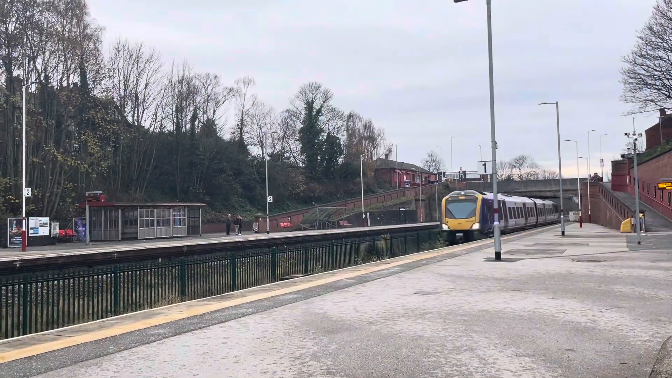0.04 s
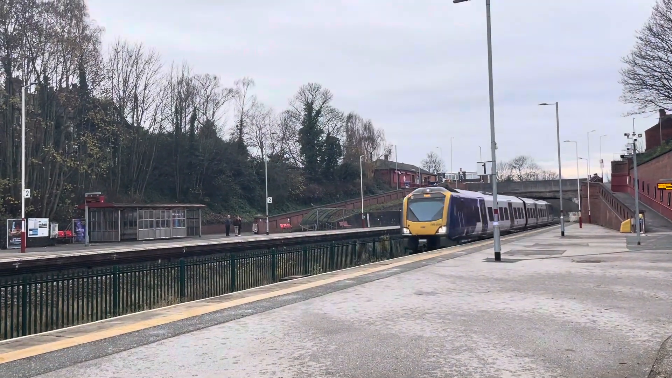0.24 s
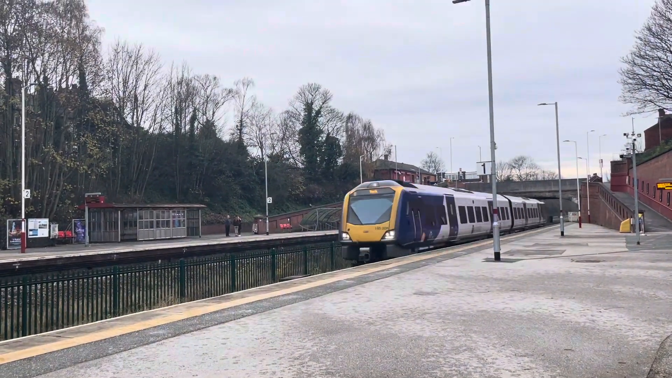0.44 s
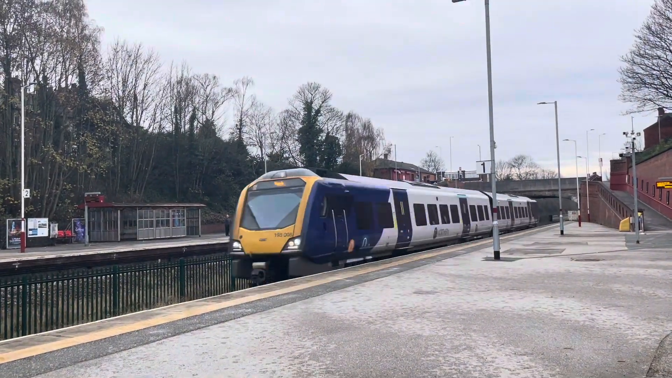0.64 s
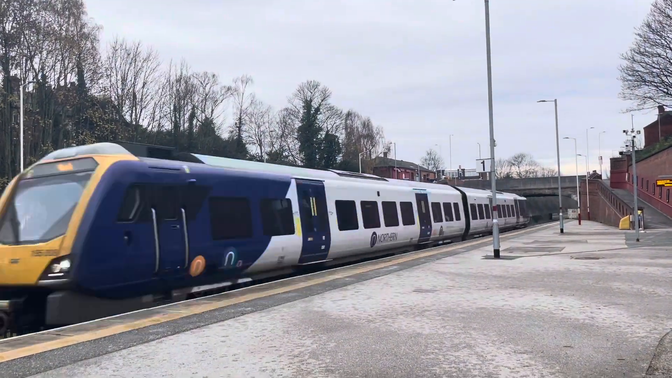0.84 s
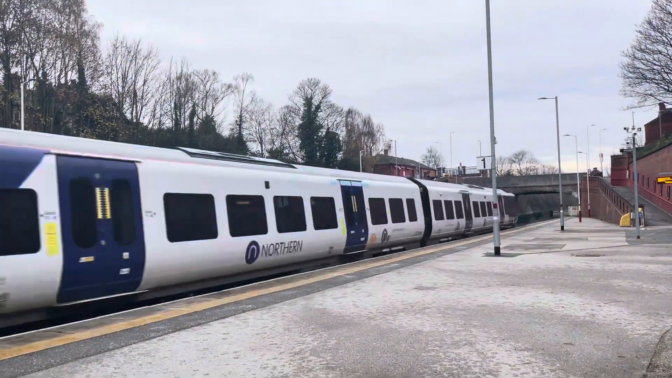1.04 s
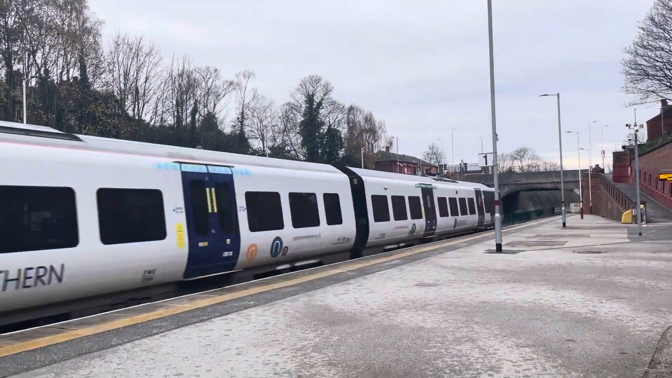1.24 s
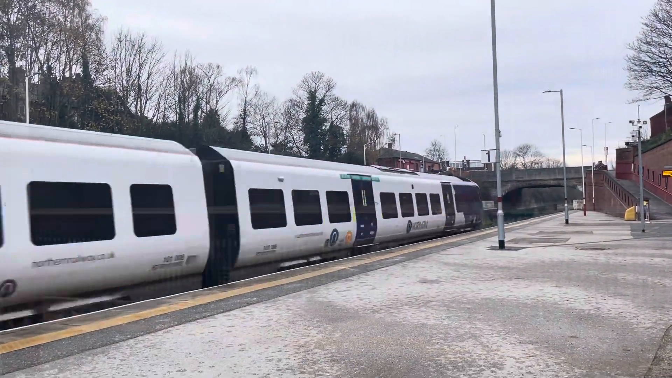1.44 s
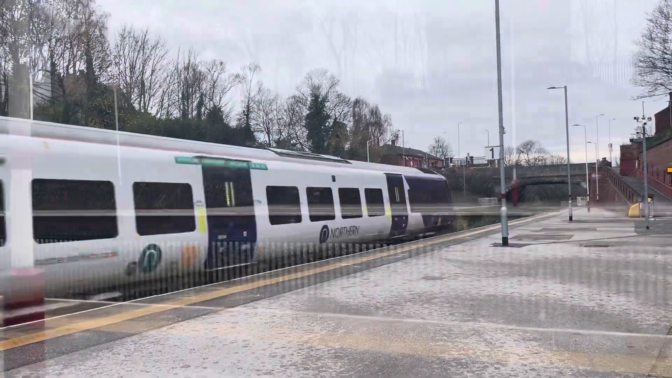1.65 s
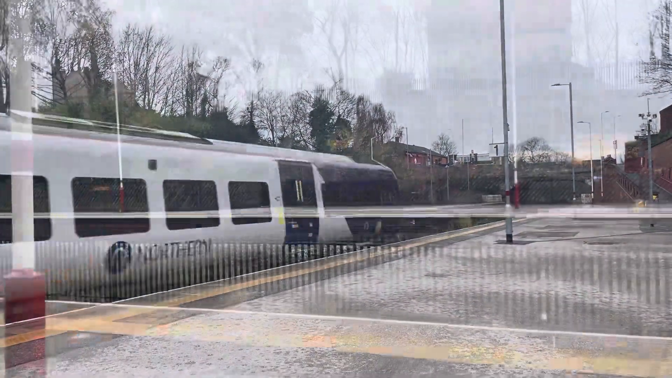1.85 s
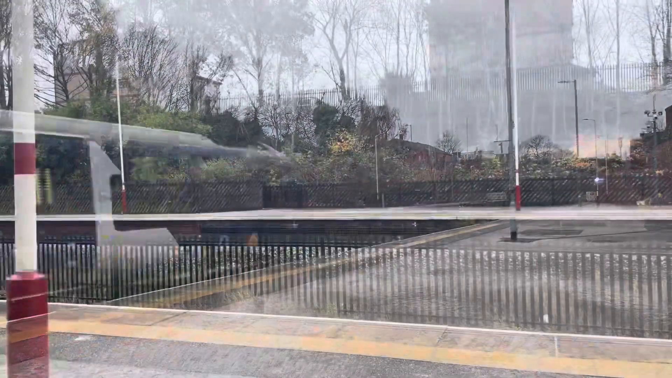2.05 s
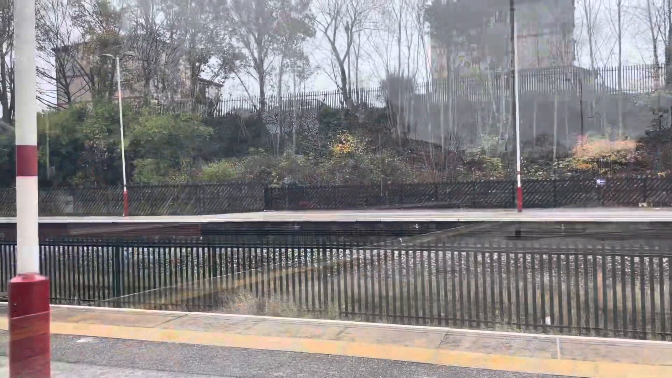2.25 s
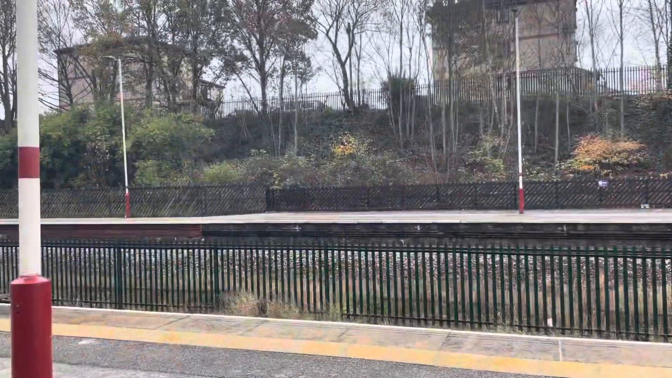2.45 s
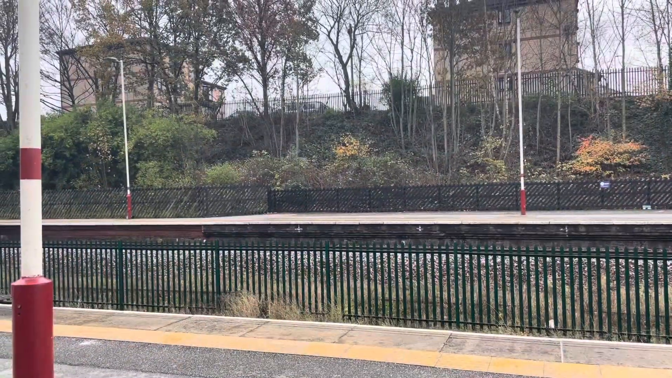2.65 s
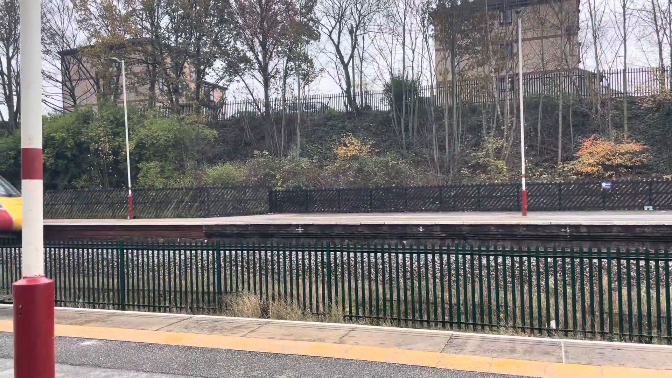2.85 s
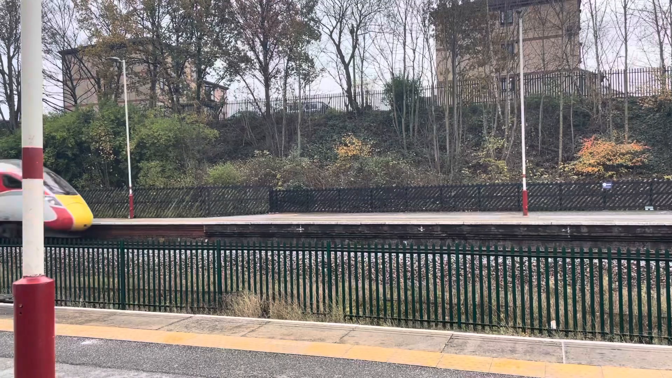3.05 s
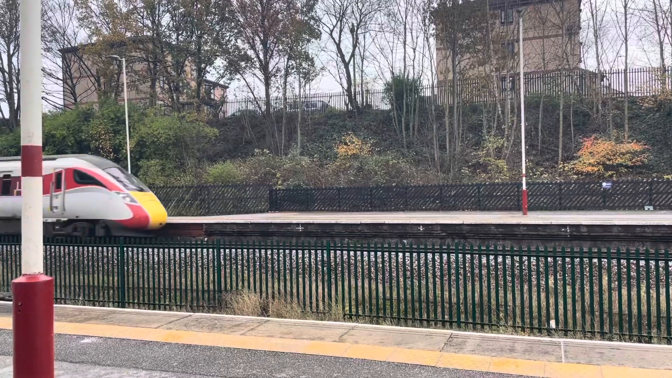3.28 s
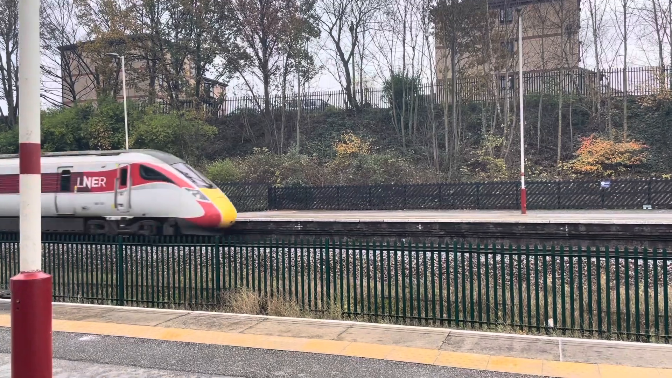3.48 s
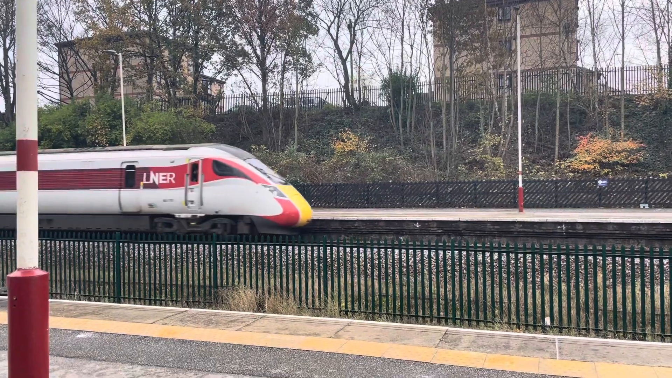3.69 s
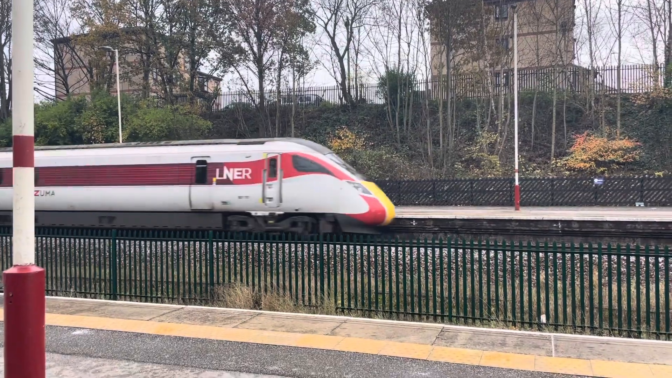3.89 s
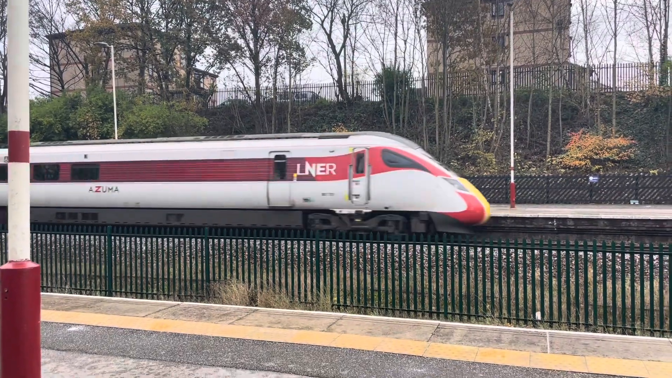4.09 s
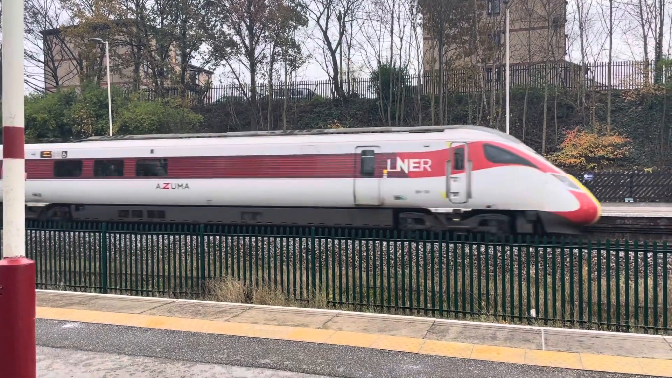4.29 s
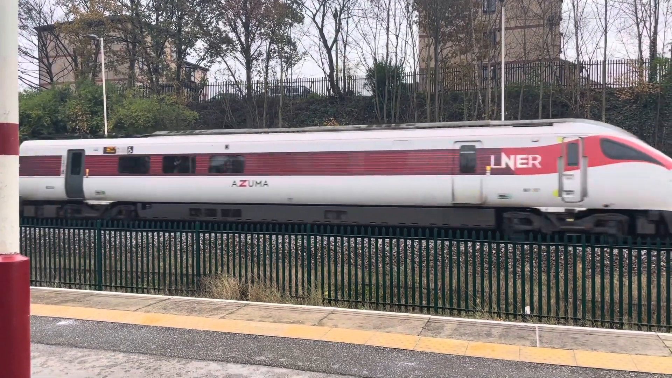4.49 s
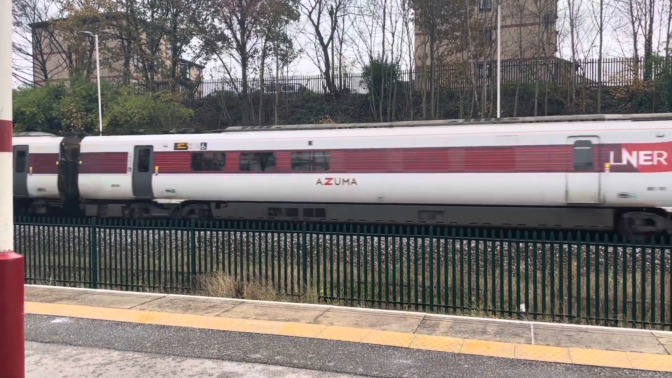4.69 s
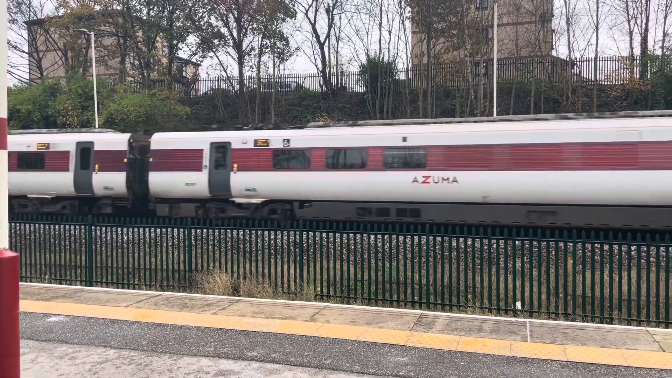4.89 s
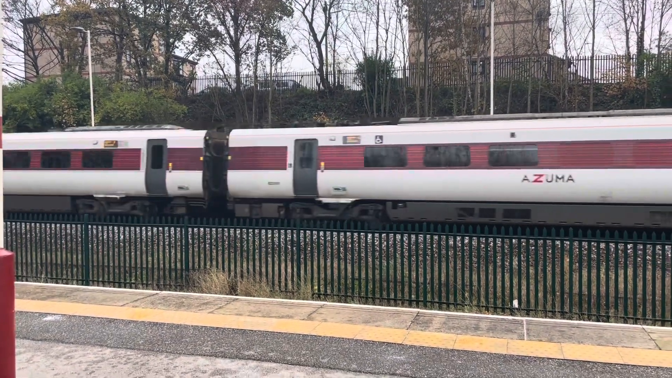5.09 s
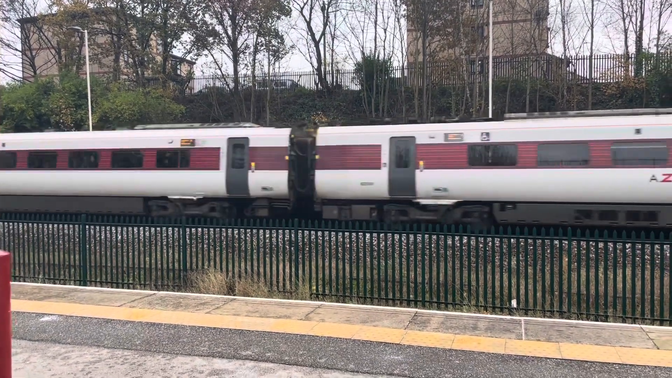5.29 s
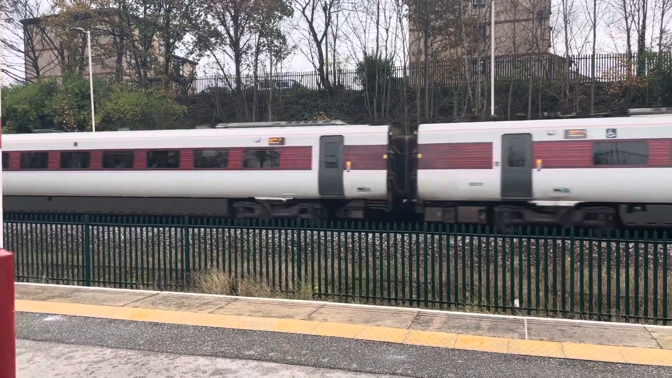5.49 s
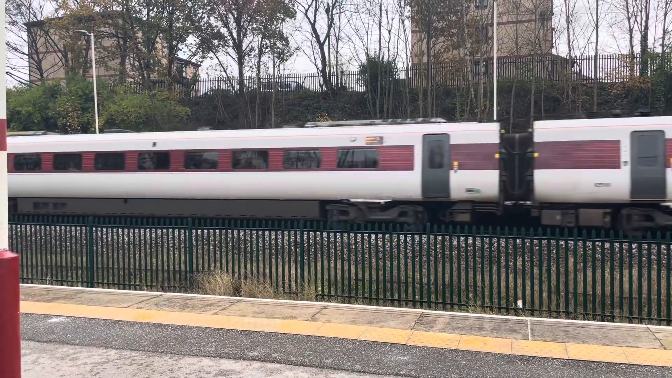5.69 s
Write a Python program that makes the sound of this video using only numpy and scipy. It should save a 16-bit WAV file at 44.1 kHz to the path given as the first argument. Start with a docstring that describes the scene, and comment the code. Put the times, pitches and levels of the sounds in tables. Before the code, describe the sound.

Outdoors on a station platform, heard in stereo. From 0 s a short train approaches very close, its broad wheel roar and low engine drone rising quickly. Around 0.7-1.1 s thumps and a brief squeal mark the first wheels; between 1 and 1.8 s it is loudest, with rough metallic ringing, rasping high notes dropping in pitch, a mid-low growl, short squeals and bumps. The deep drone dips around 1.6 s as the engine draws level, then returns lower. Thin, airy whistles slide down near 1.4 and 2 s. From about 1.3 to 2.4 s this train fades away beneath a far quieter one. From 2.4 s a long train on a distant track gives an even, gently fluttering rumble that builds after 3 s, with faint high wheel rings. From 3.8 s a low wavering hum surges repeatedly, with soft bumps near 4.2, 5 and 5.6 s, continuing until the cut at 5.7 s.

```python
"""A station platform, with two passenger trains going by. A short one rushes past close to the edge:
filtered noise for its wheel roar, a Doppler-shifted engine drone, turbo whistles and ringing wheels.
It fades into a long train on a far track: an even noise rumble, a low hum of locked tones and faint
wheel rings. Brief squeals and thumps of narrow noise are dotted over both."""
import sys
import numpy as np
from scipy import signal
from scipy.fft import rfft, irfft, next_fast_len
from scipy.io import wavfile
from scipy.ndimage import map_coordinates

SR = 44100
rng = np.random.default_rng(int(sys.argv[2]) if len(sys.argv) > 2 else 0)


def pcm_store(signal):
    """Save signal as 16-bit PCM."""
    levels = np.round(np.clip(np.atleast_2d(signal), -1, 1) * 32767)
    wavfile.write(sys.argv[1], SR, levels.astype(np.int16).T)


N = 252693
T = np.arange(N) / SR  # s
HZ = np.maximum(np.fft.rfftfreq(N, 1 / SR), 1)
SOUND_M_S, TOP_HZ = 343, 13500

# Stereo: mixing likeness and balance by pitch (likeness is held to -0.9..0.995)
# pitch_hz, likeness, left_minus_right_db
STEREO_IMAGE = [(60, 1, -2), (250, 0.92, -1.5), (480, 0.51, 2), (890, 0.76, 1.6), (1310, 0.14, -0.5),
                (1880, 0.29, -1), (2340, 0.78, 1), (3260, 0.22, 4), (4770, 0.68, 0), (6260, 0.084, 2),
                (7830, -2.35, 3.5), (10040, 1, -1), (14000, -1, 1)]
# Direction of the trains: start_s, right_channel_lag_ms
BEARING = [(0, 0.047), (.7, 0.021), (1.1, 0.34), (1.5, 0.31), (2.1, 0.37), (2.6, 0.21), (3.4, 0.12),
           (4.2, 0.09), (5.73, 0.011)]

# Far train: moment its nose draws level, speed, distance of its track, length
FAR_NOSE_S, FAR_M_S, FAR_TRACK_M, FAR_LENGTH_M = 3.4, 18.7, 33.4, 350
# Near train, likewise
NEAR_NOSE_S, NEAR_M_S, NEAR_TRACK_M, NEAR_LENGTH_M = 0.9, 35, 7.5, 56
# The near train has faded out, the far one is fully in; each fade lasts FADE_S
NEAR_GONE_S, FAR_FULL_S, FADE_S = 2.404, 2.1, 1.12

# Spectral shape of the rolling noise: pitch_hz, relative_level_db (per Hz)
FAR_COLOUR = [(20, -31), (45, 2.5), (130, -0.5), (270, -3), (370, -7), (580, -3.5), (740, -2), (1120, -7),
              (1300, -13.5), (2050, -14), (2520, -15.5), (2800, -21), (5400, -23.5), (8000, -32),
              (11500, -40.5), (13000, -45)]
NEAR_COLOUR = [(20, -26), (48, 4.5), (110, -3), (230, -4), (360, -10), (520, -8), (1000, -6), (1350, -17),
               (2500, -25.5), (3500, -27.5), (5900, -29.5), (8000, -34.5), (10500, -36), (12000, -43),
               (13000, -49.5)]
# Rail and wheel resonances: pitch_hz, width_hz, height_db (above the rolling noise)
FAR_MODES = [(243, 75, 2.8), (708, 51, 5.3), (924, 35, 7), (1108, 45, 6.2), (1560, 63, 1.9),
             (3140, 250, 5.3), (4770, 88, 2.9)]
NEAR_MODES = [(474, 110, 7), (930, 310, 2), (2455, 270, 5.5), (5680, 400, 3.2)]
# Rows are body rumble, rail roar, wheel ring, air hiss: level_db (at 0 dB swell),
# steepness (of the swell; 1 = spreading alone), flutter_db
FAR_PARTS = [(-28.5, 2.69, 0.66), (-27.5, 2.19, 0.71), (-33, 2.99, 0.53), (-37, 3.62, 0.48)]
NEAR_PARTS = [(-18, 0.47, 1), (-20, 1.024, 0.82), (-27, 0.94, 1.16), (-30.5, 1.17, 0.95)]
# Where rumble gives way to roar, roar to ring and ring to hiss
FAR_CROSSOVERS_HZ, NEAR_CROSSOVERS_HZ = [486, 1274, 3000], [358, 1430, 2680]
# Rolling noise surges as a pair of bogies comes by: centre_s, length_s, rise_db
FAR_SURGES = [(3.1, 0.14, 0.29), (4.14, 0.22, 0.53), (4.98, 0.067, 0.12), (5.48, 0.066, 0.27)]
NEAR_SURGES = [(1.09, 0.078, 0), (1.63, 0.34, 2.5)]

# Ringing of the far wheels: pitch_hz, scatter_hz, level_db (relative to the wheel ring part)
FAR_RINGS = [(2060, 140, -11), (3900, 150, -17.5)]
# Doppler glide of the far rings: start_s, pitch_factor
FAR_DOPPLER = [(2.2, 1), (3.3, 1.02), (4.4, .995), (5.73, 0.91)]
# Hum of the far drive swells as driven bogies come by: start_s, line_level_db, octave_level_db
HUM_LEVELS = [(2.3, -47.5, -50.5), (2.75, -46, -46.5), (3.55, -46.5, -48.5), (3.8, -40.5, -33.5),
              (3.97, -40.5, -39), (4.14, -32, -34), (4.33, -37.5, -46), (4.6, -38, -46), (4.8, -37.5, -40),
              (5.02, -31.5, -38.5), (5.15, -36.5, -44), (5.38, -31, -35), (5.5, -37.5, -40.5),
              (5.6, -29, -47), (5.73, -39, -40)]
# Centre pitch of the hum line, and level of the engine drone two octaves under it
HUM_HZ, DRONE_DB = 232.6, -43.5

# Bogies rumble over a rough spot: centre_s, pitch_hz, length_s, level_db
BUMPS = [(.75, 343, 0.05, -27.5), (1.0, 490, 0.035, -26), (1.0, 234, 0.21, -27), (1.155, 160, 0.024, -20.5),
         (1.491, 343, 0.048, -35), (1.475, 591, 0.03, -23), (1.525, 555, 0.034, -28),
         (1.598, 465, 0.031, -23), (1.786, 239.3, 0.19, -30.5), (4.2, 140.8, 0.12, -38.5),
         (4.96, 390, 0.045, -32), (5.57, 255, 0.06, -33), (5.688, 791, 0.032, -30)]
# Short wheel squeals: centre_s, pitch_hz, glide_hz_per_s, length_s, level_db, roughness (0-1)
SQUEALS = [(0.64, 954, 60.5, 0.14, -29.5, 0.6), (1.066, 920, 296, 0.05, -33, 0.6),
           (1.351, 946, 199.5, 0.051, -27, 0.6), (1.326, 1200, 2, 0.062, -35, 0.8),
           (1.447, 1580, -1.5, 0.071, -31, 0.8), (1.623, 2130, -900, 0.05, -29, 0.5),
           (2.236, 2054, -300, 0.06, -47.5, 0.8), (2.986, 2046, -200, 0.059, -46, 0.5),
           (3.18, 2070, 0, 0.06, -45, 0.9), (4.045, 2070, -500, 0.064, -45, 0.9),
           (4.577, 3195, 500, 0.03, -41.5, 0.5), (5.13, 3880, 0, 0.07, -46, 0.8)]

# Growl of the near drive: start_s, pitch_hz, level_db
GROWL = [(0.8, 470, -60), (1.11, 457, -27.5), (1.22, 460, -28), (1.34, 463, -20.5), (1.42, 460, -34),
         (1.48, 445, -19.5), (1.59, 436, -24), (1.68, 430, -35), (1.86, 448, -36), (1.95, 453, -26),
         (2.06, 438, -36), (2.4, 430, -73)]
# Near engine: moment it draws level, firing rate at rest
ENGINE_PASSES_S, FIRING_HZ = 1.64, 75.3
# Drone level alongside before the dip, second harmonic relative to it before it thins out nearby
ENGINE_DB, SECOND_DB = -12, -19
# Other engine overtones: multiple (of the firing rate), level_db (relative to the firing line)
ENGINE_ORDERS = [(2.5, -17.5), (3, -15.5), (4, -20)]
# The drone dips while the engine is straight across: depth, and reach along the track
ABREAST_DIP_DB, ABREAST_M = -13, 4.9

# Near wheelsets, each with its own modes: passes_s, level_db
WHEELSETS = [(1.12, -28.5), (1.33, -34.5), (1.6, -27)]
# Spectral shape of their ringing: pitch_hz, relative_level_db (per Hz)
WHEEL_COLOUR = [(700, -37), (1300, -6), (2450, 2.5), (3000, -4), (3600, -10.5), (6100, -7.5), (7500, -33),
                (13000, -45)]
# Singing bogies of the near train: passes_s, pitch_hz, glide_hz_per_s, length_s, level_db
BOGIES = [(1.18, 2358, -300, 0.17, -26), (1.541, 2320, -1800, 0.13, -29)]
# A higher wheel mode sings along: pitch, level relative to the main ring
UPPER_RING_HZ, UPPER_RING_DB = 5700, -12
# Turbochargers, one for each car: passes_s, pitch_hz (at rest), level_db (alongside)
TURBOS = [(1.36, 10140, -45), (1.975, 9980, -41)]
# Closest distance, width of the whistle, how sharply it swells close by (power of the distance gain)
TURBO_M, TURBO_WIDTH_HZ, TURBO_BEAM = 9.5, 220, 2.3
# Rushing air around the whistle: level relative to it, width
RUSH_DB, RUSH_WIDTH_HZ = 1, 1400


def undb(db):
    """Decibels to gain."""
    return 10 ** (np.asarray(db) / 20)


def curves(table):
    """Each column after the first (s), drawn as a line through time."""
    s, *columns = np.transpose(table)
    return [np.interp(T, s, column) for column in columns]


def spectra(table):
    """Each column after the first (Hz), drawn as a line over log frequency."""
    hz, *columns = np.transpose(table)
    return [np.interp(np.log(HZ), np.log(hz), column) for column in columns]


def unit(x):
    """Scaled to rms 1."""
    return x / np.sqrt(np.mean(np.abs(x) ** 2))


def walk(rate):
    """Smooth random drift of rms about 1 that changes about rate times a second."""
    step = max(int(SR / rate / 20), 1)
    size = next_fast_len(N // step + 2, real=True)
    hz = np.fft.rfftfreq(size, step / SR)
    smoothing = np.exp(-.5 * (hz / rate) ** 2)
    coarse = irfft(rfft(rng.standard_normal(size)) * smoothing, size)
    return unit(np.interp(np.arange(N) / step, np.arange(size), coarse))


def cycle(hz):
    """Phase of something that turns hz times a second."""
    return 2 * np.pi * np.cumsum(hz) / SR


def tone(phase, rough, width_hz):
    """A sine line; the share rough of its power is smeared over width_hz by scattered paths."""
    rough = np.clip(rough, 0, 1)
    scatter = (walk(width_hz) + 1j * walk(width_hz)) / np.sqrt(2)
    envelope = np.sqrt(1 - rough) + np.sqrt(rough) * scatter
    return np.sqrt(2) * np.real(envelope * np.exp(1j * phase))


def bell(s, length):
    """A smooth swell of height 1 around time s."""
    return np.exp(-.5 * ((T - s) / (0.64 * length)) ** 2)


def note(s, hz, glide, length, db, rough, spread):
    """A gliding note that swells briefly and dies away; spread is its width as a share of hz."""
    pitch = hz + glide * np.clip(T - s, -2 * length, 2 * length)
    return tone(cycle(pitch), rough, spread * hz) * undb(db) * bell(s, length)


def fade(progress):
    """An even rise from 0 to 1."""
    return np.clip(progress, 0, 1)


def resonances(modes):
    """Gain at every frequency of a set of (pitch_hz, width_hz, height_db) peaks."""
    return undb(sum(db / (1 + (2 * (HZ - hz) / width_hz) ** 2) for hz, width_hz, db in modes))


def wheel_modes(count, width_hz, height_db):
    """Differently worn steel wheels add thin, unevenly spaced resonances, up to height_db tall."""
    draws = rng.random((count, 2))
    return [(1200 + 5500 * (k + place) / count, width_hz, height_db * size)
            for k, (place, size) in enumerate(draws)]


def bend(x, pitch):
    """A sound with its pitch multiplied by a changing factor."""
    return map_coordinates(x, [np.cumsum(pitch * np.ones(N))], order=3, mode="mirror")


def pair(direct, diffuse):
    """A direct and a diffuse sound mixed to left and right by pitch; their pure tones may coincide."""
    likeness, balance_db = spectra(STEREO_IMAGE)
    likeness = np.clip(likeness, -.9, .995)
    sides = np.array([[1], [-1]])
    shared = rfft(direct) * np.sqrt((1 + likeness) / 2)
    opposed = sides * rfft(diffuse) * np.sqrt((1 - likeness) / 2)
    return irfft((shared + opposed) * undb(sides * balance_db / 2), N)


def aim(x):
    """Sound from the left reaches the right channel later."""
    lag_ms, = curves(BEARING)
    return np.array([x[0], np.interp(T - lag_ms / 1000, T, x[1])])


def train_db(nose_s, speed, track_m, length_m):
    """A train is a line of sources: power follows the angle it fills (0 dB = the whole track)."""
    nose_m = speed * (T - nose_s)
    tail_m = nose_m - length_m
    angle = np.arctan(nose_m / track_m) - np.arctan(tail_m / track_m)
    return 10 * np.log10(angle / np.pi)


def surges_db(table):
    """Extra loudness of the bogies that are passing."""
    return sum(db * bell(s, length) for s, length, db in table)


def fly_by(passes_s, track_m):
    """A point of the near train: metres past the listener, distance gain, Doppler factor."""
    along = NEAR_M_S * (T - passes_s)
    distance = np.hypot(along, track_m)  # track_m is the closest approach
    doppler = 1 / (1 + NEAR_M_S / SOUND_M_S * along / distance)
    return along, track_m / distance, doppler


def rolling(swell_db, levels, crossovers_hz, colour, modes, drift, flutter_rate):
    """Roughness of wheel and rail shakes body, rails and wheels; each part swells with the train."""
    noise = pair(*rng.standard_normal((2, N)))
    steady = irfft(rfft(noise) * undb(spectra(colour)[0]) * resonances(modes), N)
    # the resonances wander as one wheel after another takes over
    pitch = 1 + drift * walk(3)
    rest = rfft(np.array([bend(side, pitch) for side in steady]))
    parts = []
    for hz in crossovers_hz:
        below = 1 / (1 + (HZ / hz) ** 10)
        parts.append(irfft(rest * below, N))
        rest = rest * (1 - below)
    parts.append(irfft(rest, N))
    # uneven track loads all parts together, and each flutters alone
    load = walk(flutter_rate)
    moving = []
    for part, (db, steepness, flutter_db) in zip(parts, levels):
        flutter = flutter_db * (.5 * load + walk(flutter_rate))
        moving.append(unit(part) * undb(db + steepness * swell_db + flutter))
    rumble, roar, ring, hiss = moving
    return aim(rumble + roar) + ring + hiss


def hum(swell_db):
    """Far engines and drive: a drone and its octave, and two thin wavering lines locked to it."""
    phase = cycle(HUM_HZ * (1 + 0.00402 * walk(6)))
    line_db, octave_db = curves(HUM_LEVELS)
    line = tone(phase, rough=0.25, width_hz=12) * undb(line_db)
    octave = tone(2 * phase, rough=0.13, width_hz=16) * undb(octave_db)
    drone = tone(phase / 4, rough=0.48, width_hz=11.0)
    drone_octave = undb(6.5 + 3.2 * swell_db) * tone(phase / 2, rough=0.4, width_hz=17)
    return line + octave + (drone + drone_octave) * undb(DRONE_DB)


def far_wheels(swell_db):
    """Far wheel modes come and go, waver, and glide with the Doppler curve, sinking at the end."""
    doppler, = curves(FAR_DOPPLER)
    ring_db, steepness, _ = FAR_PARTS[2]
    rings = 0
    for hz, scatter_hz, db in FAR_RINGS:
        phase = cycle(hz * doppler * (1 + 0.00601 * walk(4)))
        level_db = ring_db + steepness * swell_db + db + 3.8 * walk(7)
        rings = rings + tone(phase, 0.98, scatter_hz) * undb(level_db)
    return rings


def bumps():
    """A bogie shakes the track for a moment: a short, rough, low-to-middle note."""
    return sum(note(s, hz, 0, length, db, rough=0.94, spread=0.15) for s, hz, length, db in BUMPS)


def squeals():
    """A wheel mode sings out briefly."""
    return sum(note(*row, spread=0.023) for row in SQUEALS)


def growl():
    """The near drive growls on one unbroken note that sags and swells as each car goes by."""
    hz, db = curves(GROWL)
    return tone(cycle(hz), rough=0.35, width_hz=34) * undb(db)


def bogies():
    """The wheels of a bogie ring in a rasping band that drops in pitch, with a thinner ring above."""
    rings = 0
    for s, hz, glide, length, db in BOGIES:
        rasp = note(s, hz, glide, length, db, rough=0.97, spread=0.055)
        upper = note(s, UPPER_RING_HZ, 0, length, db + UPPER_RING_DB, rough=1, spread=0.028)
        rings = rings + rasp + upper
    return rings


def whistle(passes_s, hz, db):
    """A thin whistle in a wide band of rushing air: it drops in pitch and is loud only close by."""
    _, gain, doppler = fly_by(passes_s, TURBO_M)
    phase = cycle(hz * doppler)
    thin = tone(phase, 1, TURBO_WIDTH_HZ)
    rush = undb(RUSH_DB) * tone(phase, 1, RUSH_WIDTH_HZ)
    return (thin + rush) * undb(db) * gain ** TURBO_BEAM


def turbos():
    """Each car's turbo whistle slides down as it passes."""
    return sum(whistle(*car) for car in TURBOS)


def high_notes():
    """The high notes of the near bogies and turbochargers."""
    return bogies() + turbos()


def wheelset(passes_s, db, beam):
    """The many modes of one wheelset ring unevenly and slide down together as it rushes past."""
    _, gain, doppler = fly_by(passes_s, NEAR_TRACK_M)
    modes = wheel_modes(count=30, width_hz=57, height_db=19)
    colour = undb(spectra(WHEEL_COLOUR)[0]) * resonances(modes)
    ring = unit(irfft(rfft(pair(*rng.standard_normal((2, N)))) * colour, N))
    passing = np.array([bend(side, doppler) for side in ring])
    return passing * gain ** beam * undb(db + 2 * walk(40))


def wheelsets():
    """The near wheels, one set after another."""
    return sum(wheelset(s, db, beam=2.8) for s, db in WHEELSETS)


def engine():
    """Near exhaust drone: a strong firing line and weaker, rougher overtones that drop as it passes."""
    along, gain, doppler = fly_by(ENGINE_PASSES_S, NEAR_TRACK_M)
    phase = cycle(FIRING_HZ * doppler * (1 + 0.0083 * walk(8.8)))
    firing = tone(phase, rough=0.014, width_hz=8)
    overtones = sum(undb(order_db) * tone(order * phase, rough=0.25, width_hz=8.5)
                    for order, order_db in ENGINE_ORDERS)
    # the second harmonic carries far along the track and vanishes alongside
    second = undb(SECOND_DB) * tone(2 * phase, rough=0.4, width_hz=8.0) * (1 - gain)
    dip_db = ABREAST_DIP_DB * np.exp(-(along / ABREAST_M) ** 2)
    return ((firing + overtones) * gain ** 1.19 + second) * undb(ENGINE_DB + dip_db)


def scene():
    """The near train dies away while the far one comes in."""
    far_fade = fade(1 + (T - FAR_FULL_S) / FADE_S)
    near_fade = fade((NEAR_GONE_S - T) / FADE_S)
    far_db = train_db(FAR_NOSE_S, FAR_M_S, FAR_TRACK_M, FAR_LENGTH_M) + surges_db(FAR_SURGES)
    near_db = train_db(NEAR_NOSE_S, NEAR_M_S, NEAR_TRACK_M, NEAR_LENGTH_M) + surges_db(NEAR_SURGES)

    far_modes = [*FAR_MODES, *wheel_modes(count=40, width_hz=34, height_db=5.0)]
    far = rolling(far_db, FAR_PARTS, FAR_CROSSOVERS_HZ, FAR_COLOUR, far_modes,
                  drift=0.016, flutter_rate=15)
    far = far + pair(far_wheels(far_db), far_wheels(far_db))

    near_modes = [*NEAR_MODES, *wheel_modes(count=40, width_hz=10, height_db=9.0)]
    near = rolling(near_db, NEAR_PARTS, NEAR_CROSSOVERS_HZ, NEAR_COLOUR, near_modes,
                   drift=0.012, flutter_rate=14)
    near = near + wheelsets() + pair(high_notes(), high_notes())

    # the low sounds are alike on both sides, apart from the lag
    low = hum(far_db) * far_fade + bumps() + growl() + engine() * near_fade
    return far * far_fade + near * near_fade + aim([low, low]) + pair(squeals(), squeals())


def record(dry):
    """Soft 4 ms edges, the deepest bass shed below 30 Hz and a steep cut above TOP_HZ."""
    edges = np.clip(np.minimum(T, T[-1] - T) / .004, 0, 1)
    thinned = signal.sosfilt(signal.butter(2, 30, "high", fs=SR, output="sos"), dry)
    top_cut = signal.ellip(8, .2, 70, TOP_HZ, fs=SR, output="sos")
    return signal.sosfilt(top_cut, thinned * edges)


dry = scene()
out = record(dry)
pcm_store(out)
```